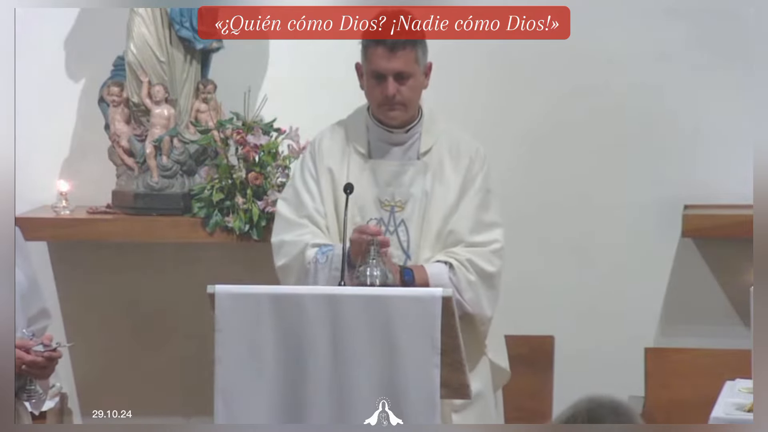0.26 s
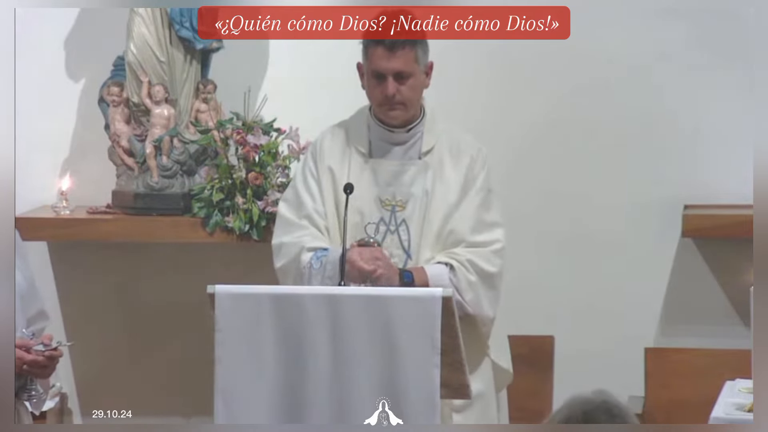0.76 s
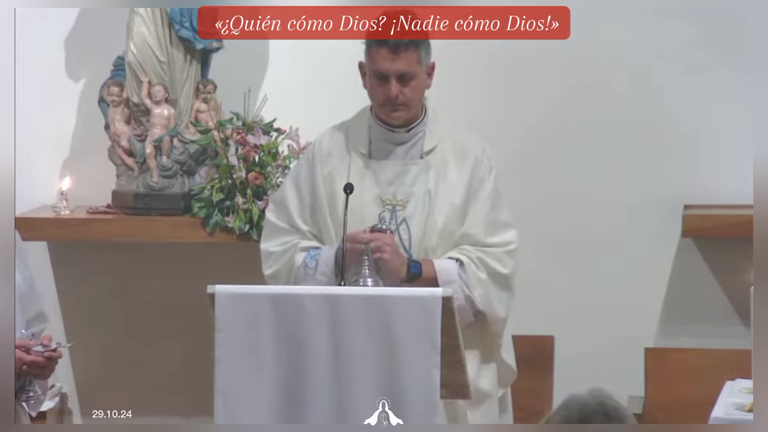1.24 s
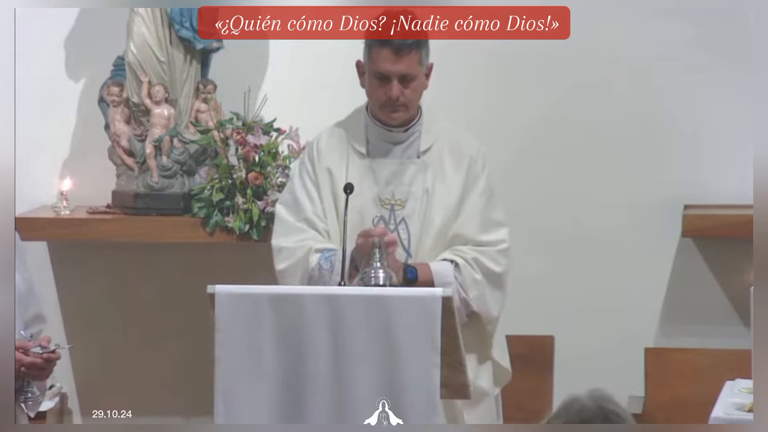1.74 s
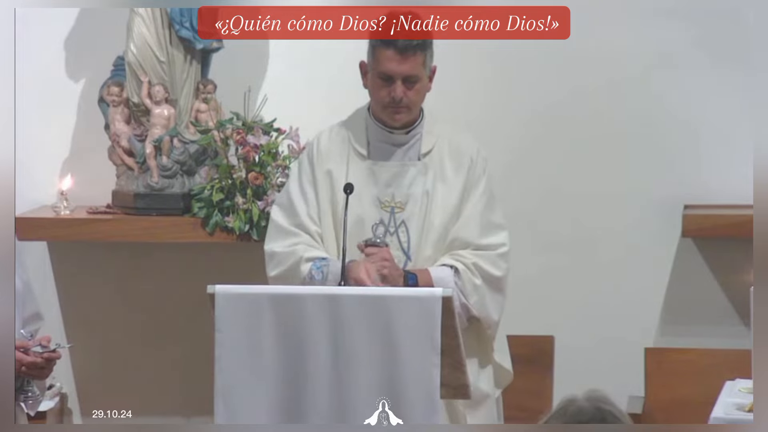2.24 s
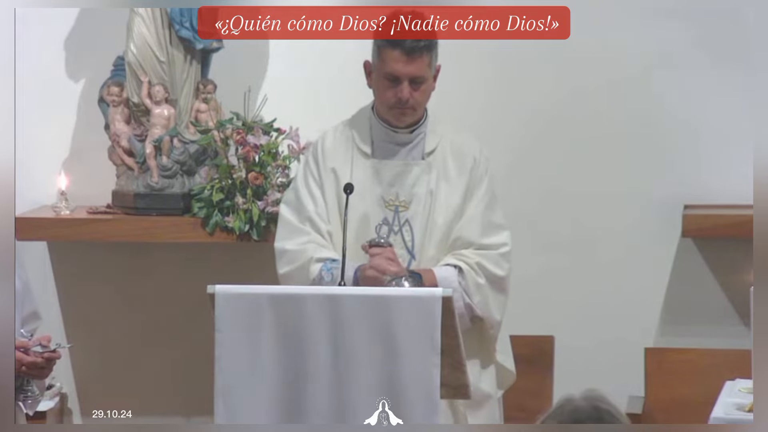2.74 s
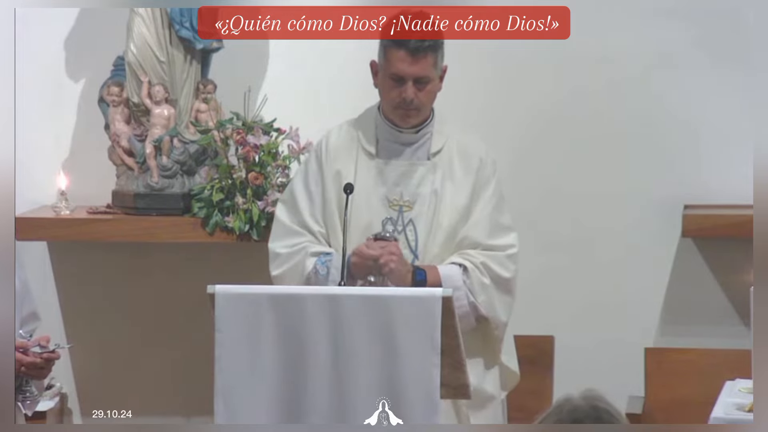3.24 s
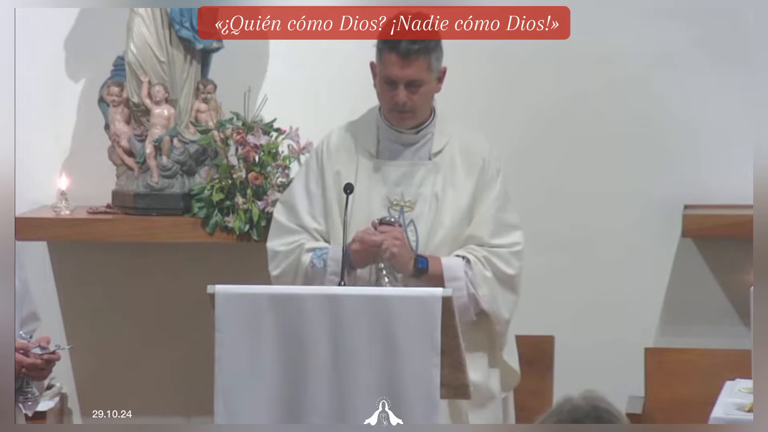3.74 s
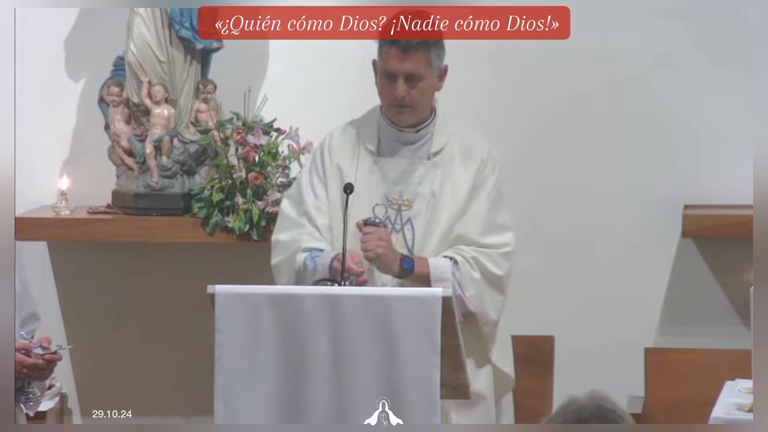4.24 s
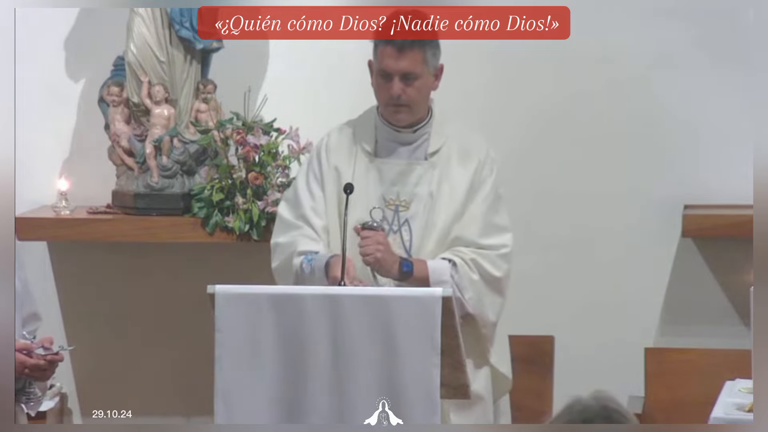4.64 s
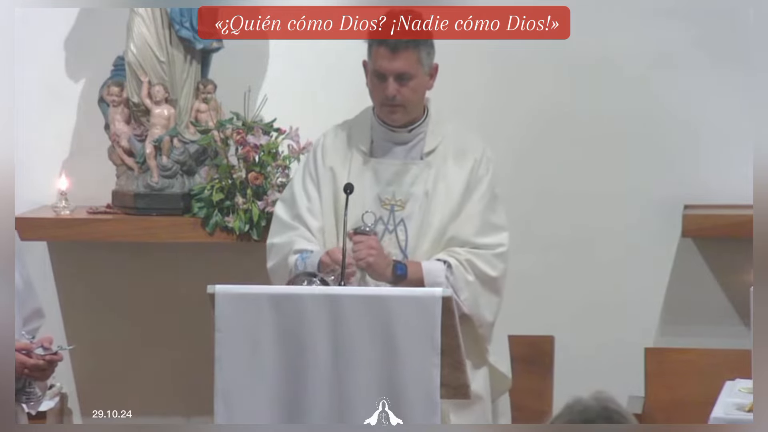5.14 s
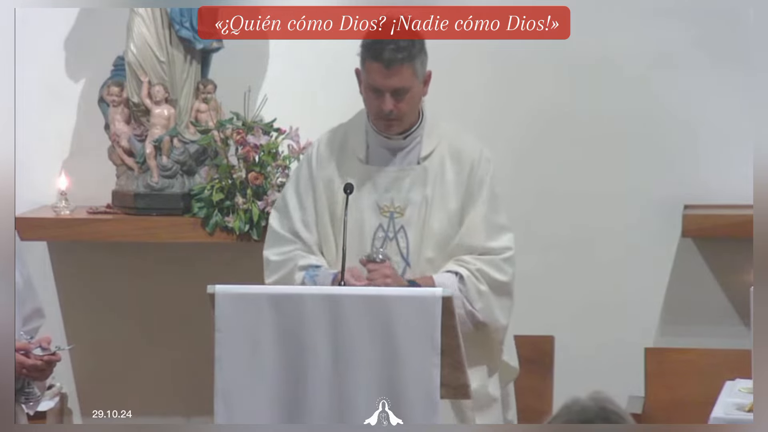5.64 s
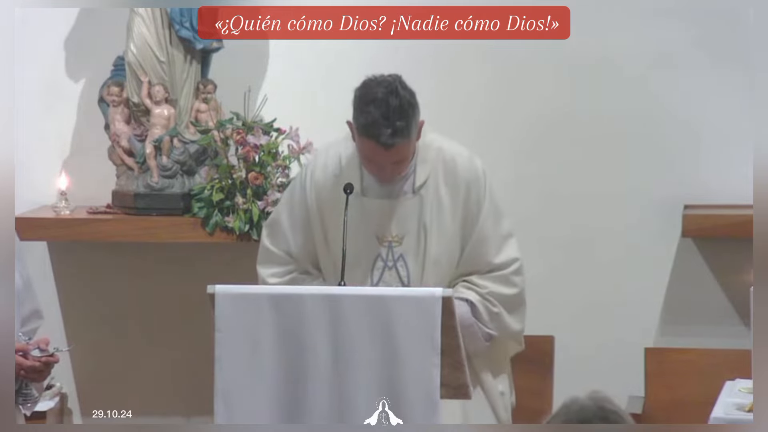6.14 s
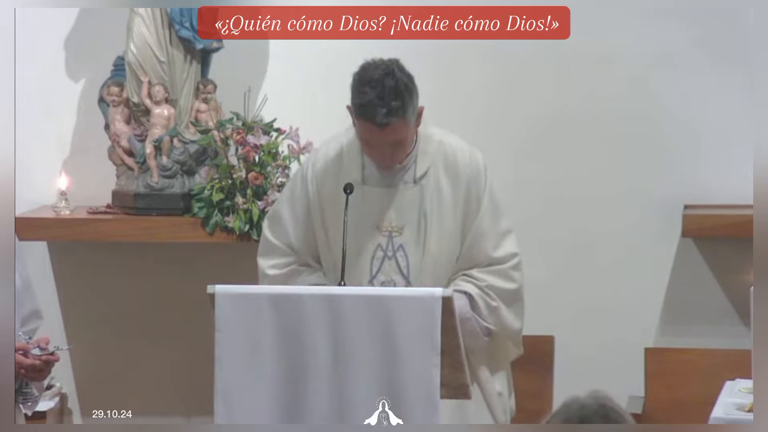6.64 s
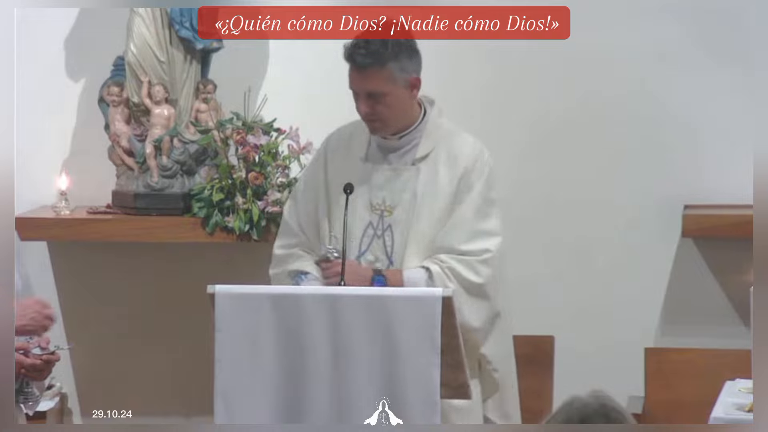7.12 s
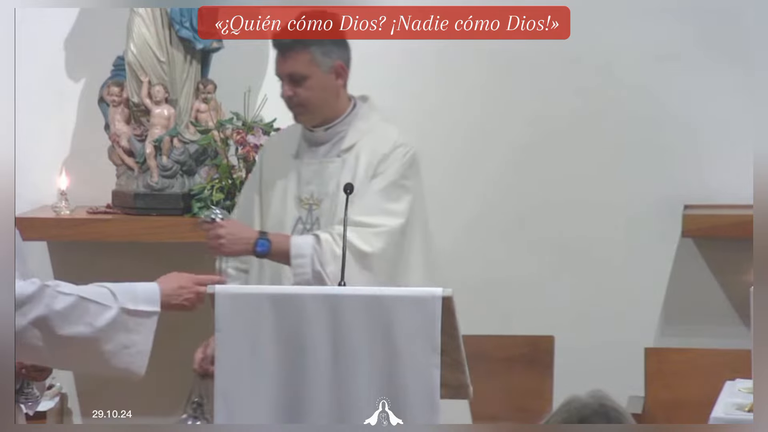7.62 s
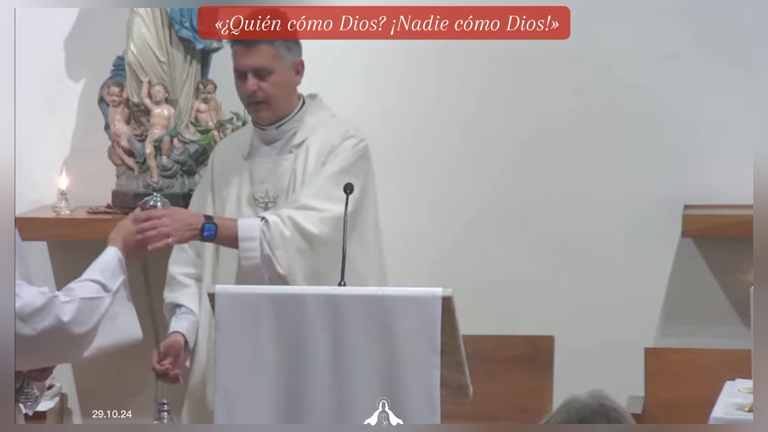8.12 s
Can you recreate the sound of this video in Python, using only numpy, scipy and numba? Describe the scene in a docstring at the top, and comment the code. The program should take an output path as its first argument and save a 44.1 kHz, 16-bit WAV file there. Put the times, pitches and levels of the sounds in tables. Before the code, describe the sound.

Bright, crisp chain clinks and jingles come in uneven clusters, several each second, with short ringing from bowl and lid. A few dull rustles and brief scrapes slip between them. After about six seconds the blows thin to light ticks. The close microphone squashes the loud hits; a short diffuse room echo and steady hiss lie underneath.

```python
"""Swinging censer in a church hall

A metal censer on chains sounds close to a lectern microphone: links clash and rattle on, struck metal rings,
a ring slides over the lid once, and soft rustles and one faint ping pass. Random contacts excite decaying sine modes.
Filtered noise makes the hall's hum and hiss, and decaying noise its reverberation; the lectern top adds a quick
treble echo. Gain control turns loud passages down and a limiter holds the peaks."""
import sys
import numpy as np
from scipy import signal
from scipy.fft import rfft, irfft
from scipy.io import wavfile
from scipy.ndimage import uniform_filter1d, minimum_filter1d
from numba import njit

SR = 44100
rng = np.random.default_rng(int(sys.argv[2]) if len(sys.argv) > 2 else 0)


def wrap_up_sound(samples):
    """Save the sound to the file named by the first command line argument, as 16-bit audio."""
    columns = np.atleast_2d(samples).T
    # keep every value between -1 and 1, then stretch to whole-number steps
    tamed = np.clip(columns, -1, 1)
    steps = np.round(tamed * 32767).astype(np.int16)
    wavfile.write(sys.argv[1], SR, steps)


N = 369116
RING_TIME = np.arange(SR // 3) / SR  # time axis of every modal response, s


def undb(db):
    """Decibel law: 20 dB is a factor of ten in amplitude."""
    return 10 ** (np.asarray(db) / 20)


def level(x, db):
    """Root-mean-square level: scale x to the given dB re 1."""
    return x * undb(db) / np.sqrt(np.mean(x ** 2))


def fade(t60):
    """Exponential decay: 60 dB are lost in t60 seconds, never in less than 4 ms."""
    return np.exp(-np.log(1000) * RING_TIME / np.maximum(t60, .004))


def curve(table):
    """Linear interpolation: the columns of a timed table, one value a sample."""
    seconds, *columns = np.transpose(table)
    return [np.interp(np.arange(N) / SR, seconds, column) for column in columns]


def spectrum(table, hz):
    """Interpolation on a logarithmic frequency axis: dB at each hz from rows of (Hz, dB)."""
    table_hz, db = np.transpose(table)
    return np.interp(np.log(hz), np.log(table_hz), db)


def band_noise(gain):
    """Spectral shaping: white noise weighted by a gain at each frequency."""
    return irfft(rfft(rng.standard_normal(N)) * gain, N)


def add_at(out, start, sound):
    """Superposition: add a sound to out from a start sample."""
    out[start:start + len(sound)] += sound


def ring(modes, spread_db):
    """Modal superposition: one tap, energy 1, excites decaying sines by weight and by chance."""
    hz, db, t60 = np.transpose(modes)[:, :, None]
    shapes = np.sin(2 * np.pi * hz * RING_TIME) * fade(t60) * undb(db)

    def tap(weight=1):
        sign = rng.choice([-1, 1], len(modes))
        chance = undb(spread_db * rng.standard_normal(len(modes))) * sign
        x = (weight * chance) @ shapes
        return x / np.sqrt(np.sum(x ** 2))
    return tap


def taps(size, rate, spread_db):
    """Random impulse train: rate contacts a second on average, a few much harder; rms 1."""
    contact = rng.random(size) < rate / SR
    hardness = undb(spread_db * rng.exponential(size=size))
    return level(contact * hardness * rng.standard_normal(size), 0)


# Spectrum of the air noise. Each row: frequency in Hz, relative density in dB per Hz.
AIR = [(25, -17), (59, -26), (95, -13.5), (240, -9.5), (306, -2), (499, -5.5), (868, -6), (1040, -13),
       (2110, -15), (3590, -18), (5000, -17.5), (6300, -15.5), (8500, -17.5), (10500, -17.5), (11800, -12),
       (16000, -12)]
# Narrow hiss bands. Each row: centre in Hz, width in Hz, level in dB.
HISS = [(6034, 60, -44), (6380, 460, -35.5), (8040, 100, -44.5)]
# Swell of the hum under 400 Hz. Each row: time in seconds, gain in dB.
HUM_SWELL = [(0, -0.5), (1, -1.5), (3, 0), (5.5, 0.5), (6.3, 2.5), (7.5, 2.5), (8.37, 2.5)]
AIR_DB = -29.5  # before the swell and the hiss bands


def hall():
    """Stationary noise with a shaped spectrum, a slowly swelling hum and resonance-shaped hiss bands."""
    hz = np.maximum(np.arange(N // 2 + 1) * SR / N, 1)
    out = level(band_noise(undb(spectrum(AIR, hz))), AIR_DB)
    hum = signal.sosfilt(signal.butter(1, 400, fs=SR, output="sos"), out)
    out = out + (undb(curve(HUM_SWELL)[0]) - 1) * hum
    for centre_hz, width_hz, db in HISS:
        resonance = 1 / (1 + ((hz - centre_hz) / width_hz * 2) ** 2)
        out = out + level(band_noise(resonance), db)
    return out


HALL_T60_S, HALL_WET_DB = .6, -11


def walls(x):
    """Diffuse reverberation: convolution with decaying noise that begins after 12 ms."""
    t = np.arange(SR) / SR
    tail = rng.standard_normal(SR) * np.exp(-np.log(1000) * t / HALL_T60_S) * (t > .012)
    tail = signal.lfilter([1], [1, -.5], tail)  # walls swallow treble first
    tail = tail / np.sqrt(np.sum(tail ** 2))
    return undb(HALL_WET_DB) * signal.fftconvolve(x, tail)[:N]


ECHO_S, ECHO_TURN_RAD = .001862, 1.4  # delay and phase turn of each bounce
ECHO_GAIN, ECHO_HZ = 0.52, 7700  # gain far above ECHO_HZ, halved at ECHO_HZ


def lectern(x):
    """Comb filtering: treble bounces between lectern top and microphone, with peaks 1 / ECHO_S apart."""
    hz = np.arange(N // 2 + 1) * SR / N
    bounce = ECHO_GAIN * hz ** 2 / (hz ** 2 + ECHO_HZ ** 2)
    turn = np.exp(-2j * np.pi * hz * ECHO_S + 1j * ECHO_TURN_RAD)
    comb = np.sqrt(1 - bounce ** 2) / (1 - bounce * turn)  # the root offsets the power of the echoes
    return irfft(rfft(x) * comb, N)


# Soft dull rustles and one faint narrow ping, the first row. Each row: start in seconds, length in seconds,
# centre in Hz, width in Hz, level in dB.
SOFT_BANDS = [(1.486, 0.086, 2010, 61, -40), (3.088, 0.28, 1840, 710, -35), (3.346, 0.22, 870, 119, -33.5),
              (5.697, 0.04, 1200, 2000, -33)]


def rustles_and_ping():
    """Resonant filtering: short swells of noise, each in one band; the narrowest is heard as a ping."""
    out = np.zeros(N)
    for start, length, hz, width_hz, db in SOFT_BANDS:
        size = int(length * SR)
        resonator = signal.iirpeak(hz, hz / width_hz, fs=SR)
        band = signal.lfilter(*resonator, rng.standard_normal(SR // 2))[-size:]
        add_at(out, int(start * SR), level(band, db) * np.hanning(size) ** .5)
    return out


# Relative strength of the link modes. Each row: frequency in Hz, level in dB.
LINK_SPECTRUM = [(2000, -31), (3000, -20.5), (4300, -17.5), (4900, -9), (6000, -5.5), (7500, 1.5),
                 (10000, -1.5), (12500, -3), (16000, -10.5)]
LINK_T60_S = 0.043  # median; single modes scatter around it


def chain(count):
    """Modal density: many short random link modes, split into low, middle and top groups."""
    hz = rng.uniform(2000, 16000, count)
    t60 = LINK_T60_S * undb(2.5 * rng.standard_normal(count))
    modes = np.array([hz, spectrum(LINK_SPECTRUM, hz), t60]).T
    group = np.digitize(hz, [5800, 10000])
    return [ring(modes[group == k], 6.34) for k in range(3)]


# Ringing tones of struck metal: bowl and lid, with bright chain and lectern-echo tones at the top.
# Each entry: frequency in Hz.
METAL_TONE_HZ = [2050, 2568, 2780, 2960, 3045, 3484, 3700, 4213, 4893, 5046, 5443, 5531, 5773, 6358, 6538,
                 6800, 6971, 7176, 7558, 7620, 7990, 8088, 8611, 9206, 9282, 9500, 9729, 10400, 11944,
                 12514, 13533, 15163]
# Their decay, in the same order. Each entry: t60 in seconds.
METAL_TONE_T60 = [0.16, 0.11, 0.12, 0.04, 0.095, 0.15, 0.17, 0.14, 0.13, 0.39, 0.028, 0.078, 0.12, 0.19,
                  0.2, 0.17, 0.17, 0.22, 0.36, 0.12, 0.11, 0.44, 0.089, 0.051, 0.061, 0.23, 0.08, .12,
                  0.072, 0.1, .12, 0.16]


def metal_tones():
    """Free vibration of struck metal: equally strong tones before chance and weight."""
    return ring(np.c_[METAL_TONE_HZ, np.zeros(len(METAL_TONE_HZ)), METAL_TONE_T60], 2.5)


FAVOUR_WIDTH, OTHERS_DB = 0.019, -13  # width in log frequency; a broad skirt of other tones


def favour(hz):
    """Selective excitation: weights of the metal tones for a contact that mainly sets off those near hz."""
    away = np.log(np.array(METAL_TONE_HZ) / hz)
    return np.exp(-(away / FAVOUR_WIDTH) ** 2) + undb(OTHERS_DB) * np.exp(-(away / 0.4) ** 2)


# The chains pour on after a jolt. Each row: start in seconds, level in dB, time held in seconds,
# top links over that level in dB.
CHAIN_POURS = [(0.266, -13.5, 0.087, 4), (.843, -36, .01, 5), (1.078, -14.5, .2, 2), (1.4, -43, .066, -11),
               (1.746, -14, 0.047, 2.5), (2.0, -21, 0.019, -2), (2.34, -24, 0.11, -27),
               (2.542, -9.5, 0.035, 4.5), (2.789, -23.5, 0.056, -35), (3.156, -24.5, .06, -8),
               (3.329, -8.5, .1, -0.5), (3.57, -23, 0.03, -7.5), (4.098, -43, 0.029, -37),
               (4.147, -14.5, 0.094, 2), (4.372, -20.5, 0.11, -26), (4.881, -10, 0.062, 3),
               (5.1, -22, 0.031, -22), (5.525, -32, 0.063, -21), (5.704, -7.5, 0.032, 3),
               (5.93, -23, .13, -1), (6.589, -15.5, 0.014, 4), (6.862, -24, 0.035, 5), (7.0, -33, .014, 3),
               (7.608, -26, 0.019, -15), (8.15, -37, 0.067, -3), (8.26, -32, 0.11, -7)]
RATTLE_REST_DB = -48.5  # the links never quite rest
# a stronger pour dies more slowly: t60 of the middle links at 0 dB, and its growth exponent per dB
POUR_T60_S, POUR_GROWTH, TOP_FADES_FASTER = 1.72, 0.061, 1.82
# a duller pour has more low links: dB over the level, and its change per dB of top
POUR_LOW_DB, POUR_LOW_PER_TOP = -9.5, -0.27


def pouring():
    """Addition of powers: strength of low, middle and top links; each pour starts at once, holds, dies away."""
    power = np.full((3, N), undb(2 * RATTLE_REST_DB))
    for start, db, held, top_db in CHAIN_POURS:
        k = int(start * SR)
        t60 = POUR_T60_S * np.exp(POUR_GROWTH * db)
        low_db = POUR_LOW_DB + POUR_LOW_PER_TOP * top_db
        t = np.arange(min(SR, N - k)) / SR  # a pour lasts at most 1 s
        fall_db = -60 * np.maximum(t - held, 0) / t60
        groups_db = np.array([low_db + fall_db, fall_db, top_db + TOP_FADES_FASTER * fall_db])
        power[:, k:k + SR] += undb(2 * (db + groups_db))
    return np.sqrt(power)


def rattle(links, metal, count):
    """Random impact excitation: stretches of chain tick in their own colours; one brushes the metal tones."""
    strength, out = pouring(), 0
    for _ in range(count):
        ticks = taps(N, 900, 2.2) / np.sqrt(count)
        for group, size in zip(links, strength):
            out = out + signal.oaconvolve(ticks * size, group()[:SR // 10])[:N]
    upper = 0.5 * (np.array(METAL_TONE_HZ) / 8000) ** 1.2  # favours the high tones
    brushing = ticks * strength[1] * undb(-7.5)  # the last stretch, following its middle links
    return out + signal.oaconvolve(brushing, metal(favour(7600) + upper))[:N]


# Modes of the rubbed lid. Each entry: frequency in Hz.
LID_MODE_HZ = [3484, 4899, 5531, 6970, 7634, 9811, 10779, 11860, 12500]
# Their strength and decay, in the same order. Each row: level in dB, t60 in seconds.
LID_MODE_DECAY = [(-17.5, 0.33), (-40, 0.21), (-8.5, 0.12), (-12.5, 0.25), (-17, 0.11), (-20, 0.061),
                  (-15, 0.073), (-13, 0.08), (-26, 0.072)]


def lid_modes():
    """Free vibration of the lid: a few modes of unequal strength."""
    return ring(np.c_[LID_MODE_HZ, LID_MODE_DECAY], 0.9)


# The ring sliding over the lid. Each row: time in seconds, level in dB.
SLIDE_LEVEL = [(3.75, -101), (3.765, -20), (3.775, -7), (3.787, -7), (3.815, -15.5), (3.84, -78)]
SLIDE_LINKS_DB = -8  # how much the sliding ring shakes the links


def slide(lid, links):
    """Friction as dense random contacts: rubbing drives the lid's modes and shakes the links."""
    t = np.arange(N) / SR
    touching = (t > SLIDE_LEVEL[0][0]) & (t < SLIDE_LEVEL[-1][0])
    body = lid() + undb(SLIDE_LINKS_DB) * (links[1]() + links[2]())
    rubbing = taps(N, 4000, 2) * touching * undb(curve(SLIDE_LEVEL)[0])
    return signal.fftconvolve(rubbing, body)[:N]


# The tone regions that every contact also wakes. Each row: frequency in Hz, level over the chain in dB.
READY_REGIONS = [(4213, -26), (5443, -16), (7700, -14), (12200, -7)]
# the low links speak more in light, dull blows: dB, change per dB of chain, change per dB of top
LOW_DB, LOW_PER_DB, LOW_PER_TOP = -11.5, -0.36, -0.16


def voice(links, metal, db, ring_hz, ring_db, top_db):
    """Impulse response: what links and ringing metal give back to one contact this hard."""
    low, middle, top = links
    ready = sum(undb(ready_db) * favour(hz) for hz, ready_db in READY_REGIONS)
    weight = undb(ring_db) * favour(ring_hz) + ready
    low_db = LOW_DB + LOW_PER_DB * db + LOW_PER_TOP * top_db
    body = middle() + undb(top_db) * top() + undb(low_db) * low()
    return undb(db) * (body + np.sqrt(np.sum(weight ** 2)) * metal(weight))


# A link dragged briefly over the shell. Each row: middle in seconds, chain level in dB, main ring in Hz,
# that ring over the chain in dB, top links over the chain in dB.
SCRAPE_EVENTS = [(1.03, -21, 7176, -4, -15), (2.906, -21.5, 2568, 6, -10), (4.781, -11, 3026, -4.5, -14)]
SCRAPE_S = .035
REBOUND_DB = -8.5  # contacts of scrapes and rebounds, before their envelopes


def scrapes(links, metal):
    """Sustained excitation: contacts that swell and fade with no sharp start."""
    out, size = np.zeros(N), int(SCRAPE_S * SR)
    for middle, db, *colour in SCRAPE_EVENTS:
        drag = undb(REBOUND_DB) * taps(SR // 8, 6000, 0.96)[:size] * np.hanning(size)
        sound = signal.fftconvolve(drag, voice(links, metal, db, *colour))
        add_at(out, int(middle * SR) - size // 2, sound)
    return out


# Blows of the chains. Each row: start in seconds, chain level in dB, ring mainly set off in Hz,
# that ring over the chain in dB, top links over the chain in dB.
CHAIN_BLOWS = [(0.2651, 1.5, 9200, -6, 11), (0.294, -5, 9500, -8, 11.5), (.3463, -8.5, 9450, 1, 11.5),
               (0.589, -16.5, 5630, 7, -37), (.6908, -16, 5046, 0, -10), (0.7153, -12.5, 9130, -8, -7),
               (0.7834, -10, 3910, -0.5, -18), (.843, -3, 5180, -13, 7), (1.0769, 5, 6970, -8, 4),
               (1.112, 0, 8100, -19, 10.5), (1.192, -1, 7560, -1, -12), (1.2294, -2, 7600, -4, -8),
               (1.2596, 0, 8200, -16, -9), (1.327, -2.5, 8000, -12, -24), (1.3687, -5.5, 5890, 2, 2.5),
               (1.5037, -17, 3440, 1, -2), (1.7461, -0.5, 8740, 2, 1), (1.7612, -27, 8200, 12, 29),
               (1.7836, -9, 7800, -15, 19.5), (1.835, -1.5, 9860, 7.5, 11.5), (1.845, -7.5, 5100, -11, 16),
               (1.9964, -10, 2860, -2, 6), (2.0018, 0.5, 4130, -9.5, -22), (2.0394, -11.5, 3484, 2.5, -19),
               (2.046, -14, 4893, 8, -20), (2.2054, -12.5, 4980, -12, 4), (2.3405, 1, 2780, -17, 1.5),
               (2.3717, -3.5, 5630, -4, 1), (2.4115, -11, 3485, -2.5, -2), (2.4246, -10, 7640, 5, -2),
               (2.4693, -6, 3480, -12, -18), (2.5414, -7, 7530, 9, 19), (2.5517, -8.5, 7640, 3, 15),
               (2.5695, -3, 4170, -9, 13), (2.7681, -7, 3930, -7, 1), (2.789, 4.5, 4900, -7.5, -11),
               (2.809, -7, 8140, 7, -27), (2.8894, -9, 4144, 6.5, -15), (3.0094, -11.5, 4980, -3, -13),
               (3.1555, -3.5, 2990, -18, 6.5), (3.1942, -1, 5395, -4, -31), (3.203, -10, 4213, 9, -14),
               (3.3294, 10.5, 7700, -19, 2.5), (3.5702, -3.5, 5130, -28, 7), (3.6232, -6, 5450, -91, -34),
               (4.0213, -14.5, 4220, -20, -34), (4.099, -15.5, 7560, 10, -20), (4.134, -5, 2625, -10, -6),
               (4.147, -0.5, 7600, -8, 8.5), (4.167, -6.5, 7880, 12, 14), (4.1884, -4, 9300, 8, 17),
               (4.2173, -3, 9750, 6, 10.5), (4.271, -13, 6070, -7, -1), (4.371, 4, 6540, -23, 0),
               (4.4035, -12, 7910, -4, 8), (4.4318, 1.5, 4893, -7, 0), (4.465, -5, 4893, -1, 1),
               (4.6937, -12, 9500, -6, 0), (4.8833, 5.5, 7900, -18, 7), (4.91, -3.5, 7800, -15, 10.5),
               (5.102, -4.5, 8400, -3, 5), (5.1466, -0.5, 5840, -13, -43), (5.217, -17, 3570, 9, -22),
               (5.2659, -18, 5290, 4, 1), (5.325, -16, 2673, 9, -21), (5.5264, -15, 9210, -15, 7),
               (5.5632, -14.5, 4220, -10, 3), (5.7044, 8.5, 7500, -7, -0.5), (5.827, -5, 7620, -31, -10),
               (5.9279, -4.5, 6960, -1, 4), (5.9823, -4.5, 7200, -5, -8), (6.046, -19, 7700, -16, -18),
               (6.0565, 2.5, 7800, -7, -6), (6.5912, -2.5, 6400, -5, 3), (6.612, -0.5, 7300, 4, 10),
               (6.6857, -27.5, 7440, 20, 26), (6.7111, -4.5, 4000, -30, -4), (6.8633, -11, 6900, -5, 6),
               (6.8893, -13, 8300, -4, 6), (6.9076, -13, 8300, -18, 11), (6.9965, -10.5, 5450, -10, -10),
               (7.2818, -18, 2770, -13, -9), (7.6076, -12, 7620, 0, -5), (7.653, -37, 7540, 12, -8),
               (8.002, -16.5, 7760, 8.5, -9), (8.2566, -18.5, 6400, 6, -17), (8.2783, -12.5, 6540, -12, 0),
               (8.3105, -8, 3320, -9.5, -14), (8.36, -12.5, 5770, 2.5, -17)]
# rebounds last longer after a harder blow: t60 at 0 dB, and its growth exponent per dB
CLATTER_T60_S, CLATTER_GROWTH = 0.059, 0.11
CONTACT = 2.8  # amplitude added to the first contact
CRACK_DB, CRACK_T60_S = 0.5, 0.032  # extra response in the first instant


def blows(links, metal):
    """Impact with rebounds: a crack, a sharp contact and a dying clatter drive links and metal at once."""
    out = np.zeros(N + SR)
    for start, db, *colour in CHAIN_BLOWS:
        t60 = CLATTER_T60_S * np.exp(CLATTER_GROWTH * db)
        clatter = undb(REBOUND_DB) * taps(SR // 8, 6000, 2.75) * fade(t60)[:SR // 8]
        clatter[0] += CONTACT
        body = voice(links, metal, db, *colour)
        sound = signal.fftconvolve(clatter, body)
        sound[:len(body)] += undb(CRACK_DB) * fade(CRACK_T60_S) * body
        add_at(out, int(start * SR), sound)
    return out[:N]


CENSER_DB = 1  # gain of censer and reverberation over the hall noise


def scene():
    """Superposition: censer, its reverberation and the hall noise meet at the lectern."""
    links = chain(count=300)
    metal = metal_tones()
    lid = lid_modes()
    struck = blows(links, metal) + scrapes(links, metal)
    censer = struck + rattle(links, metal, count=5) + slide(lid, links) + rustles_and_ping()
    mono = lectern(undb(CENSER_DB) * (censer + walls(censer)) + hall())
    return np.array([mono, mono])


@njit
def follow(x, e, attack, release):
    """Envelope detection: a level that starts at e, quick up and slow down."""
    out = np.empty(len(x))
    for i in range(len(x)):
        e += (abs(x[i]) - e) * (attack if abs(x[i]) > e else release)
        out[i] = e
    return out


TOP_HZ = 15780  # upper edge of the passband


def record(dry):
    """Dynamic compression: a quick and a slow gain control, a very fast limiter, then a treble cut."""
    quick = follow(dry[0], .03, 1 / (.003 * SR), 1 / (.13 * SR))
    slow = follow(dry[0], 0.25, 1 / (.3 * SR), 1 / (1.2 * SR))
    x = np.clip(dry[0], -2.2, 2.2)  # the hardest blows overload the input
    quick_gain = (1 + (quick / undb(-12)) ** 2) ** -.2
    slow_gain = (1 + (slow / undb(-12.5)) ** 2) ** -.12
    x = x * quick_gain * slow_gain
    allowed = np.minimum(1, .95 / (np.abs(x) + 1e-9))
    x = x * uniform_filter1d(minimum_filter1d(allowed, size=9), size=9)  # sizes in samples
    treble_cut = signal.ellip(14, .2, 95, TOP_HZ, fs=SR, output="sos")
    return signal.sosfilt(treble_cut, np.array([x, x]))


dry = scene()
out = record(dry)
wrap_up_sound(out)
```